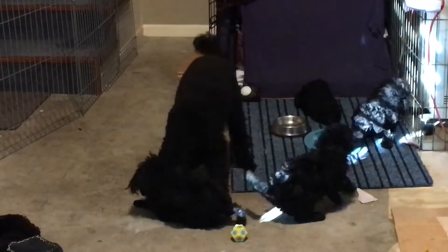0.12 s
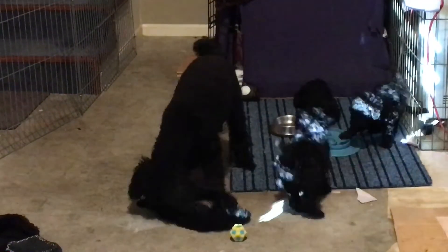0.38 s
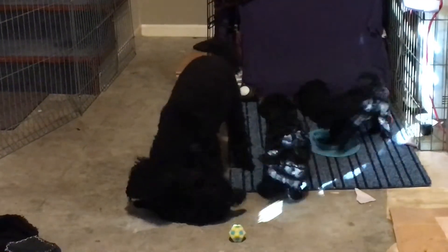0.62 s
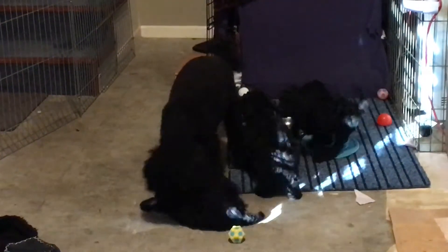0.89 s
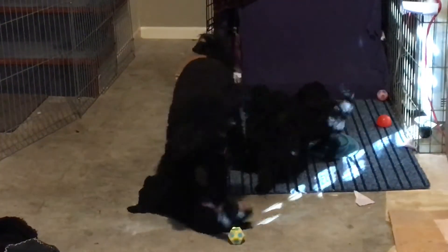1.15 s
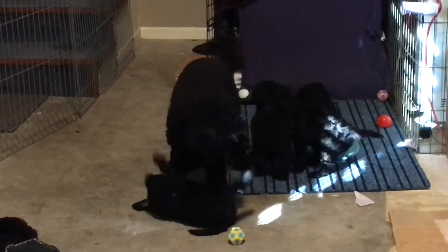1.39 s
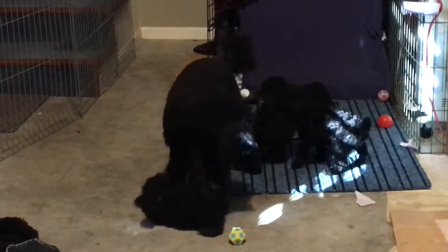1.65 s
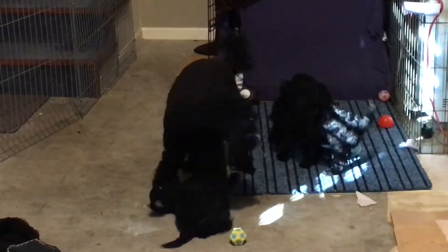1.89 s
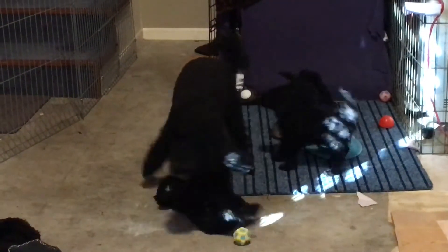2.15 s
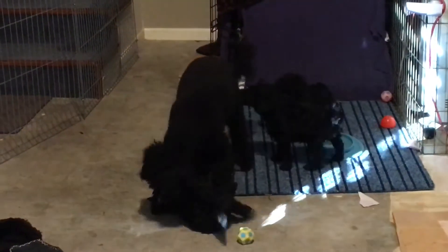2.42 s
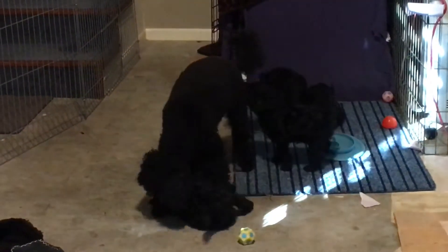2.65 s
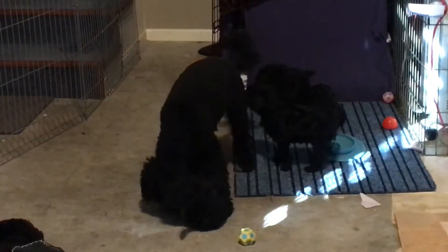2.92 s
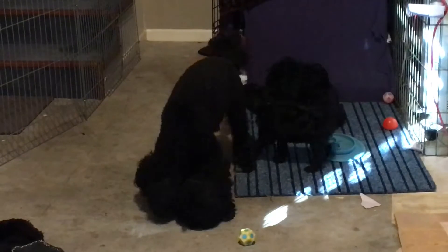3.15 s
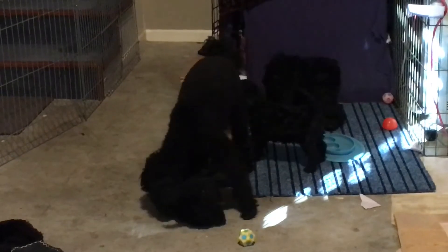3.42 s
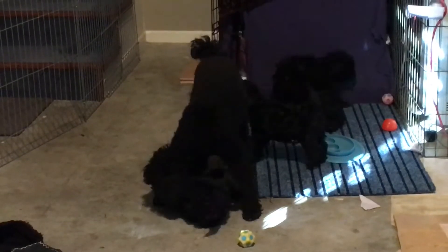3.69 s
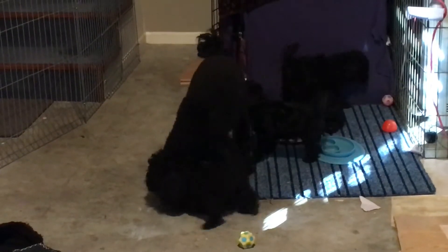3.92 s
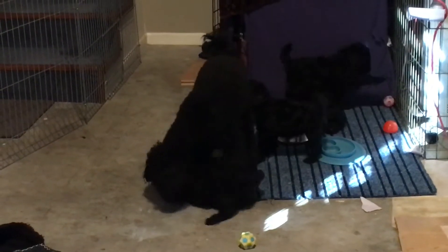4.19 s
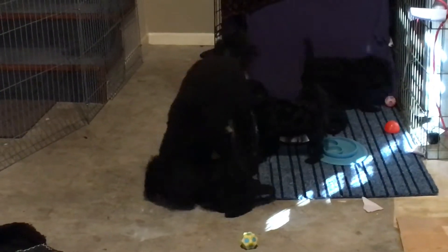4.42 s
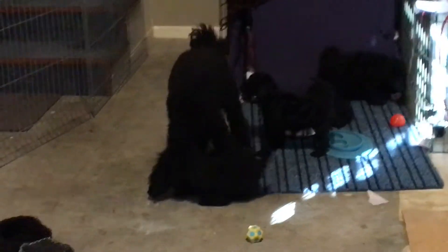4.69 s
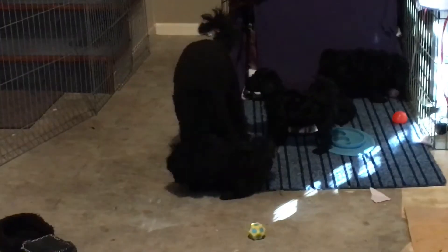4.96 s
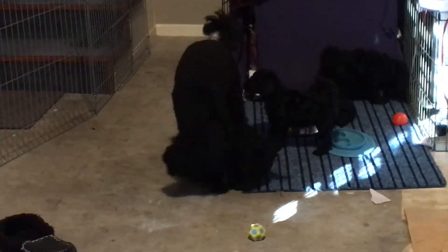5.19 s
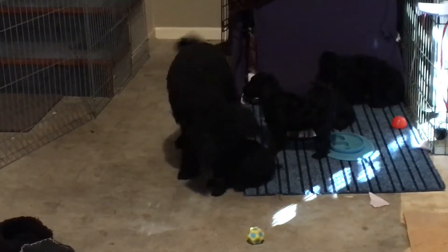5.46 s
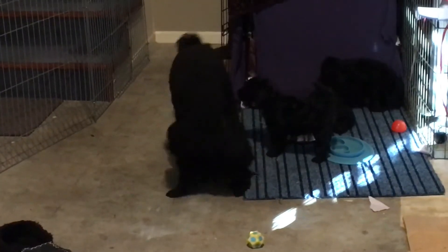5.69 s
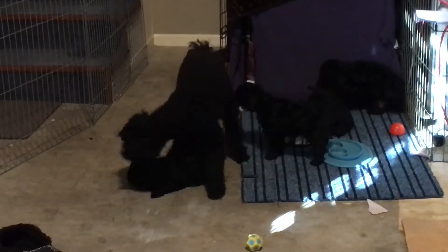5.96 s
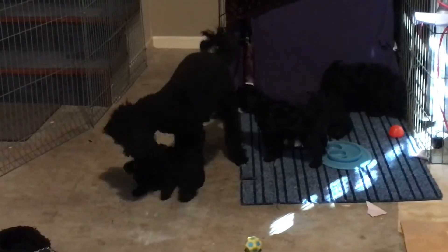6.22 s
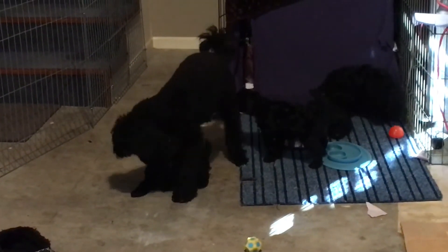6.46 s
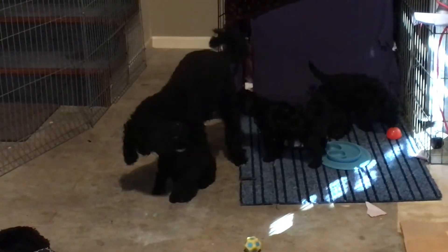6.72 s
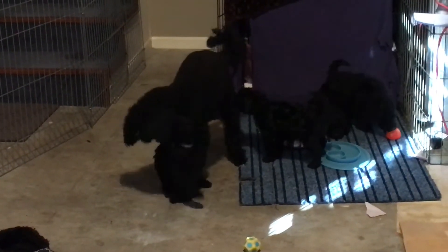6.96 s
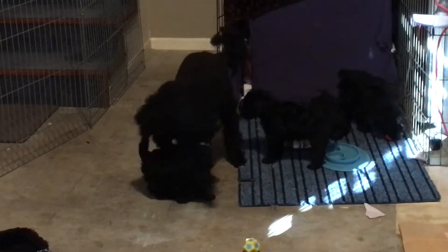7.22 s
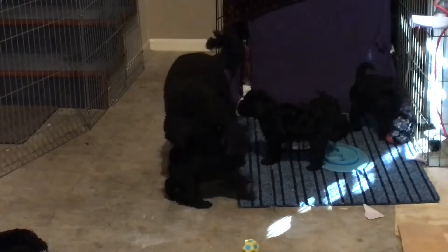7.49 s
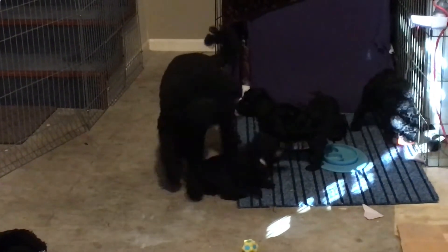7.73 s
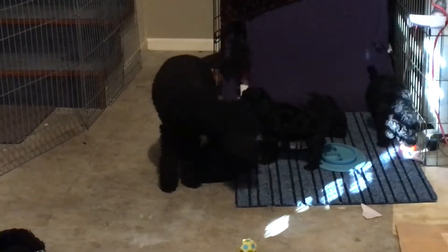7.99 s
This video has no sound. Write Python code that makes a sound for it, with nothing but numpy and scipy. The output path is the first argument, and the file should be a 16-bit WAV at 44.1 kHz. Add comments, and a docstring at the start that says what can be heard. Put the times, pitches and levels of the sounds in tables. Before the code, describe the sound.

A young puppy whines, yips and squeals in short breaking cries amid scuffing fur and claw ticks in a bare, hard-floored room.

```python
"""A puppy under a playful adult dog in a bare, hard-floored room, over low hum and small-microphone hiss.
A body bump (filtered noise) opens it amid steady rubbing; a faint far whine (sines) leads to a near, throbbing one.
From about 1 s come grumbles, claw ticks (ringing noise bursts) and the first yip; from 3 s, breaking squeals.
Near voices are jittering overtones mixed with noise puffs. Scuffs (grainy hiss) swell throughout;
the last cries fall away by 8.1 s. Bare walls answer the voices and taps."""
import sys
import numpy as np
from scipy import signal
from scipy.io import wavfile
from scipy.ndimage import uniform_filter1d

SR = 44100
rng = np.random.default_rng(int(sys.argv[2]) if len(sys.argv) > 2 else 0)


def rack_gain(trim_db):
    """Turn a fader trim in dB into the linear factor to multiply a signal by."""
    fader = np.asarray(trim_db, float)
    return 10 ** (fader / 20)


def file_out(sig):
    """Save sig as 16-bit WAV at sys.argv[1]."""
    # one column per channel
    cols = np.atleast_2d(sig).T
    # limit, then scale
    lim = np.clip(cols, -1, 1)
    pcm = np.round(lim * 32767).astype(np.int16)
    wavfile.write(sys.argv[1], SR, pcm)


N = 357784

# Wavering low hum under the room: (centre [Hz], width [Hz], level [dB])
HUM_TONES = [(67, 24, -67.5), (190.3, 28.6, -72)]
# Spectrum of room rumble and microphone hiss: (frequency [Hz], relative density [dB per Hz])
BACKGROUND_SPECTRUM = [(20, -7.5), (74, 1), (158, -20), (202, -10.5), (508, -19.5), (794, -14.5),
                       (15700, -38)]
BACKGROUND_DB = -67.5

# Spectrum of paws and fur rubbing: (frequency [Hz], relative density [dB per Hz])
RUB_SPECTRUM = [(1470, -30), (2500, -5.5), (4660, -9), (8690, -4.5), (10400, -5.5), (12900, -3),
                (15700, -10)]
RUB_DB = -72.5  # steady rubbing between scuffs
# Swells of the rubbing: (time of peak [s], level [dB], rise [s], fall [s]), rise and fall taken over 20 dB
SCUFF_SWELLS = [(.95, -65, 0.21, 0.28), (2.272, -56.5, 0.023, 0.095), (2.431, -58, 0.11, 0.13),
                (4.04, -60, 0.242, 0.48), (5.221, -63, 2.3, 0.297), (5.74, -53.5, 0.071, 0.26),
                (6.17, -64, 0.49, 0.2), (7.77, -56, .25, 0.16)]
# Bodies bumping on the floor: (time [s], level [dB], length [s])
BODY_BUMPS = [(0.0, -57.5, 0.21), (4.612, -55, 0.192)]

# Levels of voices and taps below are as at the source, ahead of the gains in scene(). # Thin whines, most from
# farther off, and a short squeak near the floor at 6.48 s: # (start [s], end [s], start pitch [Hz], end pitch
# [Hz], # level of each overtone [dB], first overtone [number], last overtone [number])
THIN_WHINES = [(0.181, 0.352, 281, 284, -76, 3, 5), (1.216, 1.669, 1855, 1722, -72, 1, 1),
               (6.477, 6.528, 1653, 1440, -63.5, 1, 1), (6.723, 7.065, 255, 270.7, -79.5, 3, 5)]

# Longer near cries that glide or break, one table each: (time [s], level [dB], pitch [Hz], mouth opening [0-1])
LONG_CRIES = [
    [(.347, -54, 723, 0.4), (.358, -44.5, 710, 0.2), (.387, -54, 682, 0.03), (.42, -38.5, 720.4, 0.28),
     (.51, -34.5, 681, 0.34), (.545, -36, 624.7, 0.36), (.6, -54.5, 609.6, 0.72), (.77, -61, 630.4, 0.41)],
    [(.852, -48.5, 299.4, 0.36), (.89, -44, 371, 0.42), (.95, -48, 301.3, 0.48), (1.07, -58, 272.7, 0)],
    [(3.022, -56, 571, 0.57), (3.04, -48.5, 510, 0.35), (3.07, -44, 499.4, 0.59), (3.12, -42, 519.4, 0.45),
     (3.17, -50, 503.6, .3), (3.22, -55.5, 499, 0.38), (3.3, -78, 495, 0.8)],
    [(3.421, -55, 444, 0.42), (3.445, -45, 448.3, 0.43), (3.462, -45.5, 597, 0.36),
     (3.52, -46, 586.6, 0.34), (3.55, -65, 548, 0.2), (3.61, -64, 574, 0.3)],
    [(3.755, -58, 702, 0.55), (3.785, -44.5, 841, 0.57), (3.82, -45.5, 827, 0.53), (3.9, -75, 840, 0.66)],
    [(3.952, -52, 577, 0.39), (3.99, -33.5, 840.4, 0.71), (4.08, -45.5, 801.3, 0.53),
     (4.13, -45.5, 791, 0.34)],
    [(4.785, -54.5, 467, 0.54), (4.805, -38, 470, 0.63), (4.815, -33.5, 706.3, 0.89),
     (4.85, -30.5, 698.8, 0.61), (4.856, -28, 565, 0.83), (4.925, -33, 550.4, 0.71),
     (4.931, -32, 452.7, 0.64), (4.97, -38, 451.5, 0.84), (5.04, -51.5, 448, 0.25)],
    [(5.09, -48.5, 639.7, 0.08), (5.135, -46, 523.4, 0.75), (5.17, -45.5, 528, 0.47),
     (5.215, -45, 575.3, 0.31), (5.31, -64, 549, 0)],
    [(5.563, -50, 435, 0.55), (5.59, -44, 424, 0.66), (5.615, -44, 451.5, 0.8), (5.64, -48, 571.7, 0.55),
     (5.69, -40.5, 696.7, 0.27), (5.72, -44.5, 688.6, 0.52), (5.77, -49, 581, 0.43), (5.8, -55, 679, 0),
     (5.87, -62, 670, 0.04)],
    [(7.305, -56, 510, 0.6), (7.355, -53.5, 582.5, 0.56), (7.37, -39, 636, 0.37),
     (7.41, -49.5, 712.6, 0.43), (7.49, -59, 655, 0.4)],
    [(7.553, -48, 649, 0.43), (7.588, -34, 642, 0.31), (7.603, -43.5, 526.3, 0.56),
     (7.66, -46.5, 430, 0.58), (7.72, -53, 385.4, 0.3), (7.8, -58.5, 319, 0)],
    [(7.935, -42.5, 319, 0.38), (7.954, -45, 342.5, 0.36), (8.02, -54.5, 361, 0.38), (8.1, -68, 348, 0)],
]
# Colour of each long cry as the head turns: (overtone slope [dB per octave], upper resonances [dB])
HEAD_TURN_COLOURS = [(-2, 6), (1.6, 0.7), (2.9, -1.5), (2.7, -6.5), (1, 2.5), (1.5, 1), (-0.1, 6),
                     (-0.1, 5.5), (2.5, 2), (-2.5, 5), (-0.5, 4.5), (1.7, -6)]
# Spells with every second or third pulse stronger, adding lines between the overtones:
# (start [s], end [s], pulses in a group [count], share of overtone height [0-1])
PULSE_GROUPS = [(3.068, 3.2, 3, .9), (5.16, 5.33, 3, .8), (7.605, 7.85, 2, .7)]
UNDERTONE_DB = 22  # loss per octave of the lines below 1/1.2 of the pitch
# Lower and upper resonances of the throat: (frequency [Hz], level [dB])
THROAT_RESONANCES = [(150, 3), (500, -0.5), (1100, -5), (2200, 4), (2900, 1), (3600, -7.5)]
# Upper resonances ahead of the lift by mouth and cry colour: (frequency [Hz], level [dB])
UPPER_RESONANCES = [(1500, -76), (3300, -44), (3800, -45.5), (4400, -39.5), (5000, -50.5), (5700, -40.5),
                    (6800, -41.5), (7700, -47.5), (8800, -75)]
PURE_TILT_DB = -1  # per octave, when the folds run almost wholly smooth
OPEN_FUNDAMENTAL_DB = -4  # change of the lowest tone at mouth opening 1
# Purer or rougher spells of the vocal folds: (start [s], end [s], roughness [0-1])
ROUGH_SPELLS = [(.3, .562, .01), (.565, .63, .4), (.9, 1.35, .45), (1.47, 1.68, .42), (1.73, 1.84, .55),
                (1.9, 2.0, .4), (2.1, 2.5, .33), (3.07, 3.2, .36), (3.47, 3.56, .4), (3.7, 4.5, .11),
                (4.855, 5.05, .3), (5.17, 5.65, .33), (5.72, 5.9, .36), (7.54, 7.597, .02), (7.6, 7.85, .5)]
USUAL_ROUGH, SPELL_EDGE_S = .2, .012
# First near whine: start, first gap and half-width of its throbs [s]; ratio of each gap and dip to the last
THROB_FROM_S, THROB_GAP_S, THROB_HALF_S, THROB_QUICKEN = .468, .031, .0105, .78

# Low near grumbles: (start [s], rise [s], length [s], peak level [dB], top pitch [Hz])
LOW_GRUMBLES = [(1.149, 0.031, .16, -51, 240.9), (1.419, 0.094, 0.2, -51.5, 251.6),
                (1.845, 0.068, 0.17, -46, 306.5), (2.108, 0.046, 0.15, -51.5, 246.3),
                (2.33, 0.032, 0.12, -56, 198)]
# A grumble at its start, peak and end: (level from peak [dB], share of top pitch [ratio], mouth opening [0-1])
GRUMBLE_CURVE = [(-10, .78, .3), (0, 1, .42), (-13, .93, .15)]
# Claws on the hard floor: (time [s], peak level [dB], centre [Hz])
CLAW_TICKS = [(1.156, -48, 10200), (1.7576, -42, 7700), (2.2616, -40, 10500), (5.0597, -46, 12500),
              (6.144, -41.5, 10970), (7.3787, -41, 9320), (7.4728, -32, 4900)]
# Duller knocks on the floor: (time [s], peak level [dB], centre [Hz])
FLOOR_KNOCKS = [(2.716, -49, 1630), (3.652, -53, 1270), (6.567, -51.5, 800),]
# Short clear near yips: (start [s], length [s], peak level [dB], pitch at the peak [Hz], mouth opening [0-1])
SHORT_YIPS = [(1.704, 0.12, -48, 579.5, 0.51), (2.782, 0.1, -49.5, 461, 0.47),
              (4.326, 0.12, -46, 602, 0.45), (4.562, 0.15, -49.5, 562, 0.53),
              (5.388, 0.076, -46, 469.3, 0.78)]
YIP_RISE_S, YIP_START_DB, YIP_FADE_DB_PER_S = .022, -6.5, 118.5
YIP_SAG_PER_S, YIP_CLOSE_PER_S = 0.45, 4  # share of pitch, mouth opening

# Decay of the bare room: (frequency [Hz], time to fall 60 dB [s])
ROOM_DECAY = [(200, 0.26), (700, 0.38), (2500, 0.48), (12000, 0.39)]
# Treble dents of the microphone housing: (centre [Hz], width [Hz])
HOUSING_DENTS = [(5100, 500), (10500, 600)]


def even(x):
    """Scales to rms 1."""
    return x / np.sqrt(np.mean(x ** 2) + 1e-20)


def read(points, hz):
    """Reads a spectrum on a log-frequency axis."""
    f, value = np.transpose(points)
    return np.interp(np.log(hz + 1), np.log(f + 1), value)


def add(mix, s, sound):
    """Mixes a sound in at s seconds."""
    part = mix[round(s * SR):][:len(sound)]
    part += sound[:len(part)]


def drift(count, size):
    """Smooth chance of rms 1, changing over about size samples."""
    return even(uniform_filter1d(uniform_filter1d(rng.standard_normal(count), size), size))


def ring(x, hz, width):
    """One resonance of gain 1 at its centre."""
    return signal.lfilter(*signal.iirpeak(np.clip(hz, 20, .45 * SR), hz / max(width, 1), SR), x)


def noise(colour, patchy_db):
    """Noise of a given spectrum with patches drifting over time and frequency."""
    a, b, patches = rng.standard_normal((N // 256 + 5, 513, 3)).T
    patches = even(uniform_filter1d(uniform_filter1d(patches, 12, 0), 10, 1))
    db = read(colour, np.fft.rfftfreq(1024, 1 / SR))[:, None] + patchy_db * patches
    return even(signal.istft((a + 1j * b) * rack_gain(db), nperseg=1024, noverlap=768)[1][:N])


def background():
    """Microphone hiss and room rumble as shaped noise; hum as noise in narrow resonances, so it wavers."""
    hum = sum(rack_gain(db) * even(ring(rng.standard_normal(N), hz, width)) for hz, width, db in HUM_TONES)
    return rack_gain(BACKGROUND_DB) * noise(BACKGROUND_SPECTRUM, patchy_db=3.5) + hum


def rubbing():
    """Grainy hiss of fur and pads swells in scuffs; bodies bump as low resonant noise."""
    t = np.arange(N) / SR
    grain = rack_gain(1.5 * drift(N, size=40) + 1.6 * drift(N, size=1200))
    hiss = noise(RUB_SPECTRUM, patchy_db=1.3)
    swells = sum(rack_gain(db - 20 * np.maximum((s - t) / rise, (t - s) / fall)) ** 2
                 for s, db, rise, fall in SCUFF_SWELLS)
    out = np.sqrt(rack_gain(RUB_DB) ** 2 + swells) * even(hiss * grain)
    thud = even(ring(ring(rng.standard_normal(N), 166, 103), 166, 103))
    for s, db, length in BODY_BUMPS:
        out += rack_gain(db) * np.clip(np.minimum(t - s, s + length - t) / 0.021, 0, 1) * thud
    return out


def thin_whine(start, end, start_hz, end_hz, db, first, last):
    """A few soft overtones of one gliding, unsteady pitch swell and fade."""
    t = np.arange(start, end, 1 / SR)
    waver = 30 / (last * start_hz) * drift(len(t), size=200)  # about 30 Hz rms at the last overtone
    hz = np.linspace(start_hz, end_hz, len(t)) * (1 + waver)
    turns = np.cumsum(hz) / SR
    tones = sum(np.sin(2 * np.pi * k * turns) for k in range(round(first), round(last) + 1))
    return rack_gain(db) * tones * signal.windows.tukey(len(t), .5)


def within(t, a, b):
    """1 inside a spell, 0 outside, with soft edges."""
    return np.clip(np.minimum(t - a, b - t) / SPELL_EDGE_S + .5, 0, 1)


def roughness(t):
    """The usual roughness of the vocal folds, replaced within each spell."""
    return USUAL_ROUGH + sum((rough - USUAL_ROUGH) * within(t, a, b) for a, b, rough in ROUGH_SPELLS)


def throbs(t, count):
    """Brief dips of level that follow ever faster."""
    shrink = THROB_QUICKEN ** np.arange(count)
    dips = THROB_FROM_S + THROB_GAP_S * (np.cumsum(shrink) - shrink)
    depth = .85 * np.exp(-((t[:, None] - dips) / (THROB_HALF_S * shrink)) ** 2)
    return np.prod(1 - depth, axis=1)


def colour_db(hz, mouth, upper_db):
    """The mouth resonance climbs and sharpens as the jaw opens and lets the upper resonances out."""
    ratio = hz / (380 * 6.98 ** mouth)
    damping = np.clip(.9 - .5 * mouth, .2, 2)
    low_db = read(THROAT_RESONANCES, hz)
    low_db = low_db - 10 * np.log10((1 - ratio ** 2) ** 2 + (damping * ratio) ** 2)
    low_db = low_db - 3 * np.log10(1 + ratio ** 4)
    # a narrow mouth shuts off the treble steeply
    low_db = low_db - 10 * np.log10(1 + (hz / (1000 + 2600 * mouth)) ** 12)
    high_db = read(UPPER_RESONANCES, hz) + 29.1 * mouth + upper_db
    return 20 * np.log10(rack_gain(low_db) + rack_gain(high_db))


def fold_tones(t, turns, effort_db, hz, mouth, rough, slope_db, upper_db):
    """Vocal folds pulse as a row of overtones; grouped pulses add lines between them."""
    locks = ((n, part * within(t, a, b)) for a, b, n, part in PULSE_GROUPS if t[0] < a < t[-1])
    group, share = next(locks, (1, 0))
    k = np.arange(1, group * int(9000 / hz.max()))[:, None] / group
    # a soft or pure voice closes its folds gently: fewer overtones
    tilt_db = slope_db + 0.26 * (effort_db + 31.5) + PURE_TILT_DB * (rough < .05)
    db = colour_db(k * hz, mouth, upper_db) + tilt_db * np.log2(np.maximum(k, 1))
    db += OPEN_FUNDAMENTAL_DB * mouth * (k == 1)
    db += UNDERTONE_DB * np.log2(np.minimum(1.2 * k, 1))
    heights = rack_gain(db) * np.where(k % 1 == 0, 1, share)
    heights *= rack_gain(2.0 * np.array([drift(len(t), size=900) for _ in k]))  # each line wavers on its own
    tones = (heights * np.cos(2 * np.pi * k * turns + (group * k) ** 2)).sum(0)
    folds = np.sqrt(2) * tones / np.linalg.norm(heights, axis=0)
    return folds * (1 + (.08 + .6 * rough) * drift(len(t), size=200))  # strong and weak pulses


def breath_puffs(t, turns, hz, mouth, upper_db):
    """Noise bursts once a cycle, coloured by throat and mouth, thinned below the pitch."""
    puffs = even((0.23 + np.exp(-(turns % 1) / 0.12)) * rng.standard_normal(len(t)))
    f, frame, z = signal.stft(puffs, SR, nperseg=512, noverlap=384)
    at = np.minimum((frame * SR).astype(int), len(t) - 1)
    low_cut = 1 + (0.74 * hz[at] / (f[:, None] + 1)) ** 8
    shape = rack_gain(colour_db(f[:, None], mouth[at], upper_db)) / low_cut
    shape = shape / np.sqrt((shape ** 2).mean(0))
    return signal.istft(z * shape, SR, nperseg=512, noverlap=384)[1][:len(t)]


def cry(rows, slope_db=0, upper_db=0):
    """Overtones of jittering vocal folds give way to puffs of noise as the voice turns rough."""
    s, *columns = np.transpose(rows)
    t = np.arange(s[0], s[-1], 1 / SR)
    effort_db, hz, mouth = (np.interp(t, s, c) for c in columns)
    rough = np.clip(roughness(t), 0, 1)
    slow_jitter = (.012 + .05 * rough) * drift(len(t), size=500)
    fast_jitter = (.006 + .11 * rough) * drift(len(t), size=110)
    turns = np.cumsum(hz * (1 + slow_jitter + fast_jitter)) / SR
    folds = fold_tones(t, turns, effort_db, hz, mouth, rough, slope_db, upper_db)
    puffs = breath_puffs(t, turns, hz, mouth, upper_db)
    voice = np.sqrt(1 - rough ** 2) * folds + rough * 1.08 * puffs
    edges = np.minimum(np.minimum(t - s[0], s[-1] - t) / 0.0078, 1)
    return rack_gain(effort_db) * voice * throbs(t, count=5) * edges


def grumble(start, rise, length, peak_db, top_hz):
    """Effort, pitch and mouth swell to one peak and sink: rows for cry()."""
    return [(start + s, peak_db + db, top_hz * share, mouth)
            for s, (db, share, mouth) in zip((0, rise, length), GRUMBLE_CURVE)]


def tap(db, hz, width, t60):
    """A claw or knock on the floor: a dying noise burst through two equal broad resonances."""
    t = np.arange(3000) / SR
    burst = rng.standard_normal(len(t)) * rack_gain(-60 * t / t60)
    burst = ring(ring(burst, hz, width), hz, width)
    return rack_gain(db) * burst / abs(burst).max()


def yip(start, length, peak_db, hz, mouth):
    """A quick rise, then effort fades, pitch sags and the mouth closes at steady rates: rows for cry()."""
    fade = length - YIP_RISE_S
    return [(start, peak_db + YIP_START_DB, hz * (1 + YIP_SAG_PER_S * YIP_RISE_S), mouth),
            (start + YIP_RISE_S, peak_db, hz, mouth),
            (start + length, peak_db - YIP_FADE_DB_PER_S * fade, hz * (1 - YIP_SAG_PER_S * fade),
             mouth - YIP_CLOSE_PER_S * fade)]


def room(x):
    """Sparse reflections of random sign off bare walls, each band dying at its own speed."""
    taps = np.zeros(SR)
    at = np.arange(200, SR - 20, 20)
    taps[at + rng.integers(0, 20, len(at))] = rng.choice([-1., 1.], len(at))
    hz, t, z = signal.stft(taps, SR, nperseg=256)
    decay = rack_gain(-60 * t / read(ROOM_DECAY, hz)[:, None])
    tail = signal.istft(z * decay, SR, nperseg=256)[1]
    return signal.fftconvolve(x, tail / np.linalg.norm(tail))[:N]


def scene():
    """Voices and taps sound in the room, over rubbing and background."""
    direct = np.zeros(N)
    for row in THIN_WHINES:
        add(direct, row[0], thin_whine(*row))
    for rows, colour in zip(LONG_CRIES, HEAD_TURN_COLOURS):
        add(direct, rows[0][0], cry(rows, *colour))
    for rows in [grumble(*row) for row in LOW_GRUMBLES] + [yip(*row) for row in SHORT_YIPS]:
        add(direct, rows[0][0], cry(rows))
    for s, *row in CLAW_TICKS:
        add(direct, s, tap(*row, width=8000, t60=.006))
    for s, *row in FLOOR_KNOCKS:
        add(direct, s, tap(*row, width=800, t60=.035))
    in_room = rack_gain(1.5) * direct + rack_gain(1.0) * room(direct)
    return (in_room + rubbing() + background())[None]


def low_pass(x):
    """Removes everything above the highest recorded frequency."""
    return signal.sosfilt(signal.butter(12, 16340, fs=SR, output="sos"), x)


def record(dry):
    """The microphone housing dents the treble twice, by a part of each resonance."""
    for hz, width in HOUSING_DENTS:
        dry = dry - 0.19 * ring(dry, hz, width)
    return low_pass(dry)


dry = scene()
out = record(dry)
file_out(out)
```